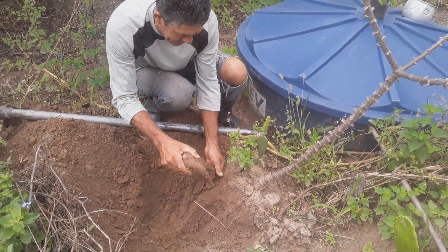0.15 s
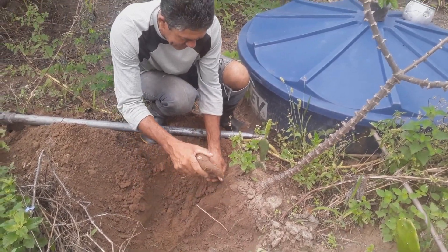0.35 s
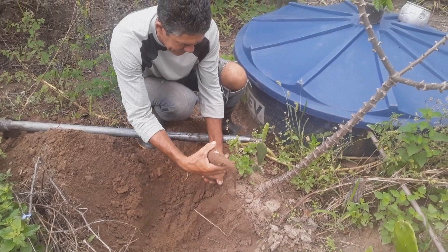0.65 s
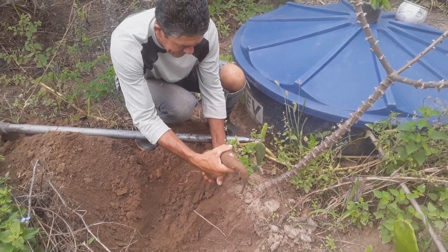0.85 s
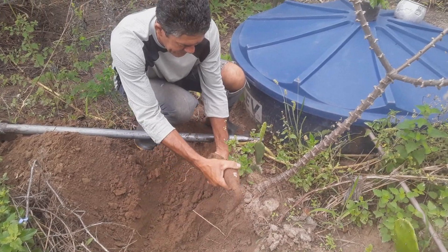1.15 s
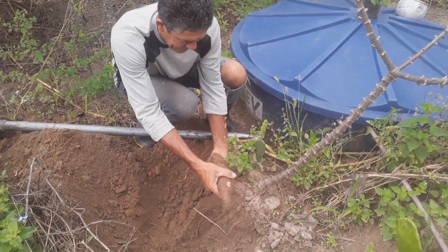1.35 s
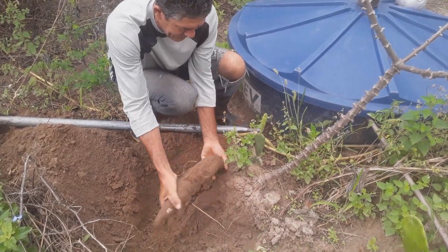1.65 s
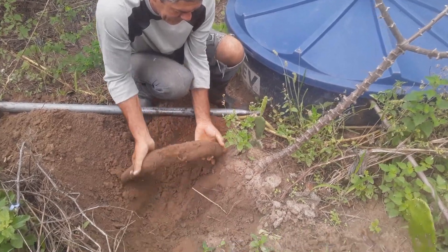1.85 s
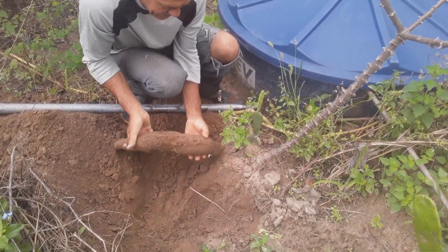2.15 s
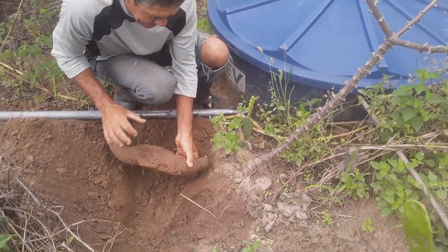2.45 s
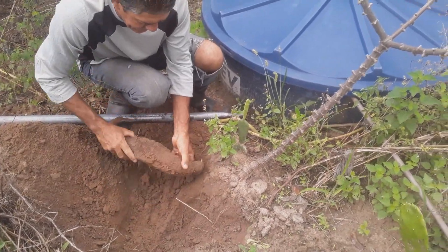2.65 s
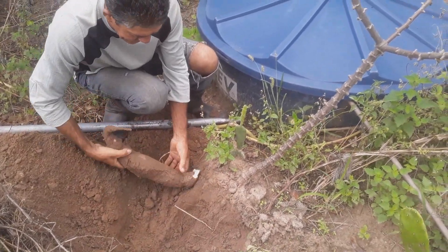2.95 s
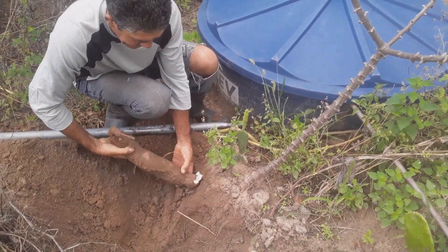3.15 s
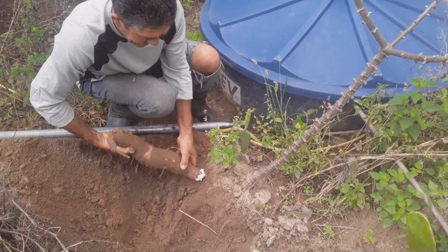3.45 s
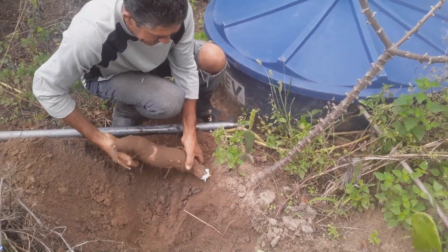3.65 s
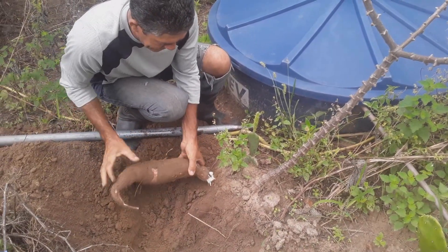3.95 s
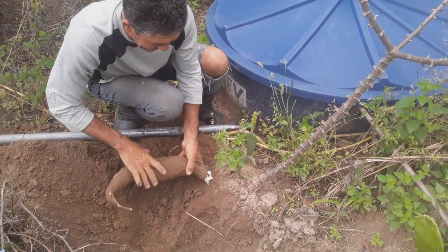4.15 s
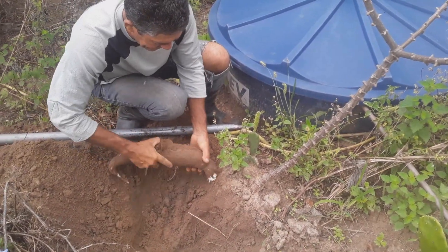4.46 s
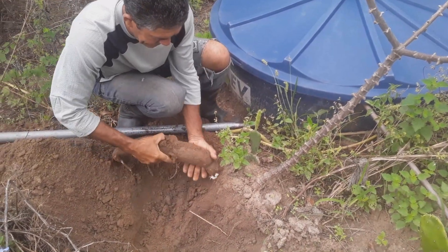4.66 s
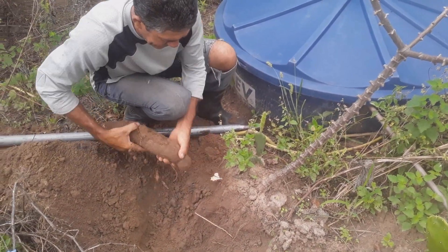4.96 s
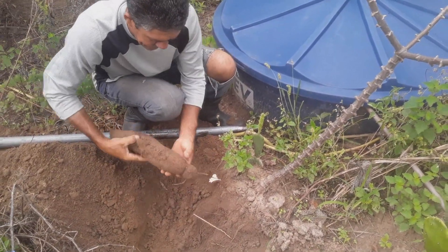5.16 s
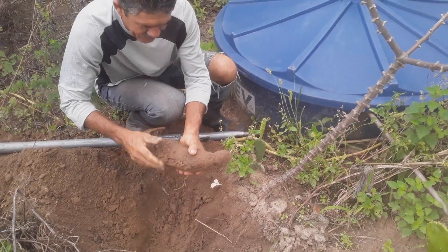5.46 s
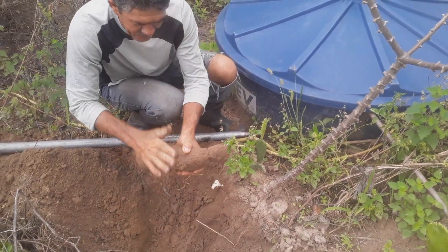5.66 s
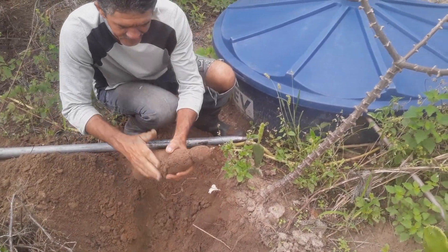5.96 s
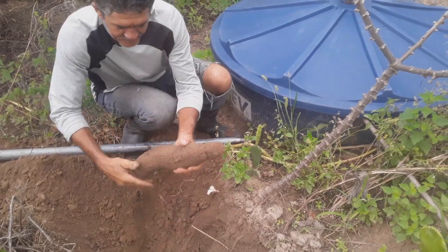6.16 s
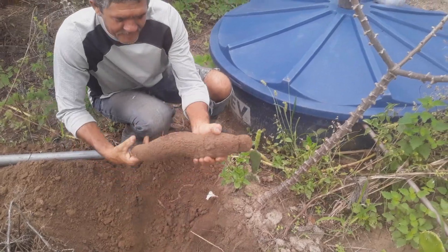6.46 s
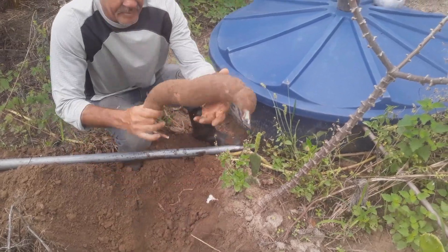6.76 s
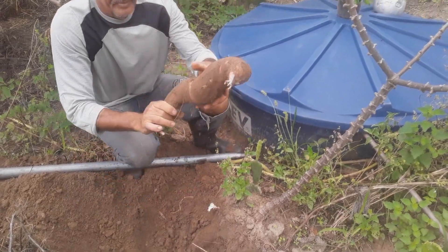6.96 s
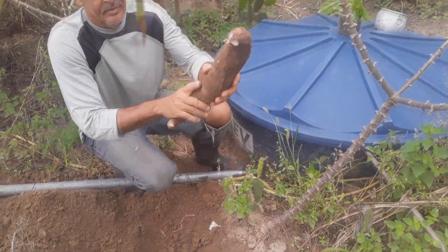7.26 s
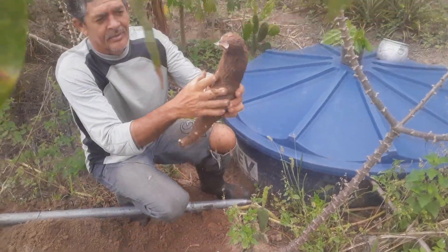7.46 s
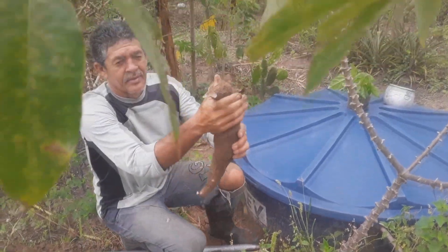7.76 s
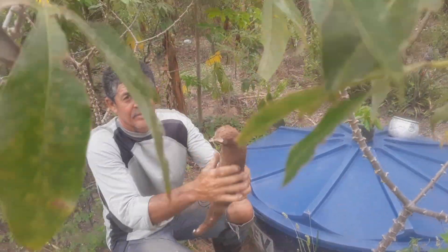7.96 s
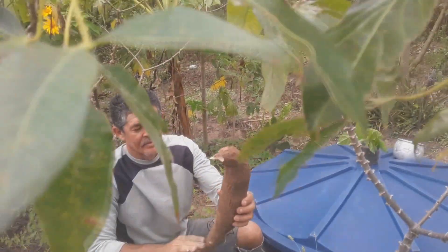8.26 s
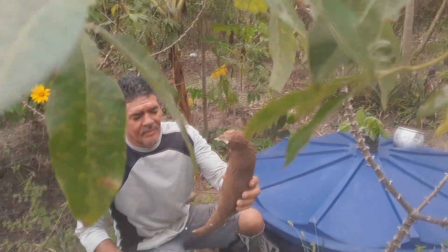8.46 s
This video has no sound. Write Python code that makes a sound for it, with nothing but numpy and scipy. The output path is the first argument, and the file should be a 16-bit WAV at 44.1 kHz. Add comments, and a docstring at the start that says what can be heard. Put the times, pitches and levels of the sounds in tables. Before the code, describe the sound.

Close snaps, crunches and gritty rubbing as a big root is pulled from dry garden earth, over a steady high buzz of cicadas.

```python
"""Cicadas sing and light wind puffs on the microphone while hands rub dry soil off a large root in a garden.
The cicadas' many clicks blur into a high buzz, and skin sliding on grit hisses and rasps. As the root is
worked loose, rootlets and clods snap, and earth crunches and thuds close by. Later a faint far tone comes
three times, something small clinks on metal and a bird chirps once, all over a soft, distant hush."""
import sys
import numpy as np
from scipy import signal
from scipy.fft import rfft, irfft
from scipy.io import wavfile
from scipy.ndimage import uniform_filter1d

SR = 44100
rng = np.random.default_rng(int(sys.argv[2]) if len(sys.argv) > 2 else 0)


def persist_wave(psi):
    """Save psi, clipped to +-1, as 16-bit WAV."""
    counts = np.round(np.clip(psi, -1, 1) * 32767).astype(np.int16)
    wavfile.write(sys.argv[1], SR, np.atleast_2d(counts).T)


N = 379066

# Levels are relative: the functions add their own gains. A spectrum says how strong each frequency is.
# how loud the cicadas are over time: t/s, level/dB
CICADA_LEVELS = [(0.0, -56.5), (1.17, -57.5), (1.6, -60.5), (2.18, -57.5), (3.47, -56), (5.29, -54.5),
                 (7.16, -60), (8.14, -56.5), (8.6, -58.5)]
# the cicadas' high buzz: f/Hz, level/dB
CICADA_SPECTRUM = [(3060, -27.5), (5200, -33), (5920, -15), (6040, 1.5), (6700, 9), (7000, 7.5),
                   (7360, -15), (8000, -16), (10400, -42.5), (17600, -120)]
# how loud the low rumble is over time (wind, and crumbling earth at about 2-3 s): t/s, level/dB
RUMBLE_LEVELS = [(0.0, -72), (0.26, -66.5), (0.81, -91.5), (1.05, -69.5), (2.0, -71), (2.32, -52),
                 (2.56, -57), (2.9, -61.5), (3.18, -68.5), (3.85, -72.5), (5.1, -72.5), (5.5, -78.5),
                 (6.25, -69.5), (6.61, -71.5), (7.04, -67.5), (7.4, -78.5), (7.9, -69), (8.23, -50),
                 (8.6, -75.5)]
# the low rumble: f/Hz, level/dB
RUMBLE_SPECTRUM = [(15, -69.5), (25, -32.5), (79, 4), (145, -3), (216, -7.5), (285, -19), (348, -20.5),
                   (600, -56), (780, -85), (1320, -120)]
# single gusts hitting the microphone: t/s, level/dB, f/Hz
WIND_PUFFS = [(0.112, -38, 104), (0.193, -40.5, 119), (0.409, -52.5, 121), (0.678, -45, 81.6),
              (0.845, -46.5, 87), (1.169, -49, 86.5), (1.515, -47.5, 74.5), (1.766, -41.5, 102),
              (4.18, -44, 81.6), (4.294, -39.5, 95.5), (5.118, -50.5, 95.4), (6.42, -49, 89.6),
              (6.55, -44.5, 99), (6.967, -41, 105), (7.023, -31, 128), (7.051, -39.5, 131.6),
              (7.308, -41.5, 107), (7.58, -40, 106), (7.749, -48.5, 115), (7.934, -40, 110),
              (7.964, -44, 103), (8.051, -32.5, 115), (8.12, -46, 109), (8.168, -33.5, 139),
              (8.185, -30, 122), (8.203, -43, 127), (8.263, -35, 110.6), (8.297, -32, 115),
              (8.325, -37.5, 112), (8.37, -42, 111), (8.554, -42.5, 94)]
# the distant garden hush: f/Hz, level/dB
HUSH_SPECTRUM = [(15, -47.5), (25, -12), (102, -1.5), (145, -5.5), (591, -24), (3080, -26), (5140, -19.5),
                 (6560, -1.5), (8360, -20), (9320, -31.5), (12900, -19.5), (16000, -23.5)]
# palms sliding on the root, one row a stroke: t/s, length/s, hiss level/dB, rasp level/dB
HAND_STROKES = [(-0.05, 0.26, -75, -61.5), (0.444, 0.28, -70, -76.5), (0.896, 0.26, -74, -66),
                (1.17, 0.24, -72, -66), (1.49, 0.23, -68, -66), (1.69, .09, -71, -62),
                (1.817, 0.15, -60, -61.5), (2.02, 0.066, -59.5, -48.5), (2.088, 0.019, -45, -65),
                (2.124, 0.21, -57, -65), (2.227, 0.039, -68, -49), (2.317, 0.025, -57.5, -48),
                (2.357, 0.18, -63.5, -72), (2.574, 0.18, -58, -68), (2.71, .043, -82, -67),
                (2.843, 0.29, -60, -66), (3.055, 0.037, -59.5, -44.5), (3.124, 0.44, -68.5, -72.5),
                (3.419, 0.029, -68, -56), (3.449, 0.17, -64, -68), (3.687, 0.24, -60.5, -65.5),
                (3.954, .12, -72.5, -72), (4.221, 0.1, -57.5, -62.5), (4.303, 0.04, -57, -67.5),
                (4.354, .15, -60, -60), (4.544, 0.11, -70, -78), (4.696, 0.12, -66.5, -71),
                (4.918, 0.049, -57, -58.5), (4.973, 0.016, -50, -62), (4.992, 0.18, -69, -70.5),
                (5.221, 0.27, -63.5, -68), (5.696, 0.045, -43, -46), (5.763, 0.27, -64, -65.5),
                (6.003, 0.056, -48, -43.5), (6.116, .06, -60.5, -68.5), (6.203, .16, -66, -70.5),
                (6.553, 0.076, -58.5, -60.5), (6.681, 0.14, -56.5, -63), (6.877, 0.098, -60.5, -67.5),
                (7.024, 0.11, -69, -74), (7.148, 0.11, -61.5, -69.5), (7.227, 0.024, -49, -60.5),
                (7.263, 0.13, -55, -59), (7.418, 0.13, -60, -64.5), (7.545, 0.13, -56, -68),
                (7.67, 0.099, -60.5, -59), (7.8, 0.094, -63, -68), (7.898, 0.15, -56, -56),
                (8.039, 0.1, -58.5, -57), (8.13, 0.077, -52, -53.5), (8.218, 0.13, -58, -63),
                (8.474, .1, -65.5, -72.5)]
# the bright hiss of skin on grit: f/Hz, level/dB
HISS_SPECTRUM = [(3240, -30.5), (5500, -9), (5780, -10.5), (6580, -5), (7320, -6), (8000, -1.5),
                 (9190, -16), (12600, -7), (15200, -6.5), (16000, -11)]
# the duller rasp of skin on grit: f/Hz, level/dB
RASP_SPECTRUM = [(710, -56.5), (1200, -22), (1320, -23), (1680, -20.5), (2060, -8), (2430, -11), (2830, -6),
                 (3060, -6.5), (3330, -1), (4040, 2.5), (5800, -4.5), (7540, -38), (12800, -120)]
# rootlets and clods snapping: t/s, level/dB, extra gain of the woody ring/dB, of the treble/dB
ROOT_SNAPS = [(0.803, -44, -15, -16), (0.888, -28, -34, -20), (0.926, -19, -15.5, -18),
              (0.959, -25.5, -26, -5.5), (0.965, -26.5, -15, -5), (0.9957, -34, -18, -24),
              (1.0185, -35.5, -12, -14), (1.047, -12, -27, -16), (1.0526, -13, -5, -12),
              (1.1023, -16, -8, -16), (1.1775, -34.5, -19, -35), (1.2027, -37, -16, -14),
              (1.271, -17, -9.5, -10.5), (1.3482, -38.5, -16, -6), (1.3973, -28.5, -48, -14),
              (1.524, -38.5, -37, -7.5), (1.5684, -27.5, -22, -7), (1.5758, -21, -28, -14.5),
              (1.6692, -13, -18.5, -14.5), (1.6907, -13, -23, -18), (1.732, -37.5, -9, -3),
              (1.7644, -31, -30, -17), (1.777, -40.5, -16, 3), (1.847, -43, -20.5, 0),
              (1.956, -31, -13, -14), (1.982, -25, -4, -17.5), (2.012, -40, -27.5, -2.5),
              (2.102, -16.5, -14.5, -27.5), (2.1138, -24.5, 0.5, -19), (2.1308, -17, -12, -15),
              (2.4197, -36, -9, -14), (2.4496, -25, -3, -6.5), (2.5659, -36, -15, -2.5),
              (2.7157, -42.5, -28, 13.5), (2.8, -29, -19, 6), (2.916, -37.5, -15, -4.5),
              (2.9553, -23, -20, -14.5), (3.0032, -24.5, -23.5, -32.5), (3.0147, -25.5, -3.5, -12),
              (3.097, -33.5, 6.5, -34), (3.4362, -25.5, -25, -6.5), (3.573, -40, -36, -1),
              (4.3168, -35, -32, -5), (4.3336, -25.5, -38, -14), (4.8099, -18.5, -5.5, -5),
              (4.8278, -26, -5, -1), (4.8373, -16, -17, -11), (4.843, -34, -36, -11.5),
              (4.85, -13, -14, -1.5), (4.8526, -17.5, -5, -9), (4.8573, -41, -27, 14),
              (5.7014, -44, -12.5, -18), (6.2527, -52, -19, 9.5), (7.2844, -45, -18, -12)]
# the main crack of a snap: f/Hz, level/dB
CRACK_SPECTRUM = [(1410, -34.5), (2400, -17), (3430, -3), (4990, -1), (6100, -2), (6800, -0.5),
                  (8090, -2.5), (9500, -19.5), (12400, -52), (20900, -120)]
# the treble (highest part) of a snap: f/Hz, level/dB
TREBLE_SPECTRUM = [(5290, -26), (9000, -7), (9700, -8), (14000, 1.5), (16000, -6)]
# the notes a broken piece rings with: f/Hz, level/dB, t60/s (the time to fade by 60 dB)
WOOD_NOTES = [(1750, 0, .007), (2300, -1, .006), (2900, -2, .006), (3500, 1, .007)]
# loose earth giving way: t/s at full force, hold/s, level/dB, extra gain of the gritty edge/dB
EARTH_CRUSHES = [(1.957, 0.06, -48.5, -5), (2.038, 0.056, -60.5, 15), (2.094, 0.028, -44.5, -7.5),
                 (2.115, 0.026, -29, -15), (2.224, 0.056, -37.5, -13.5), (2.3, .05, -38, -7.5),
                 (2.385, 0.014, -45.5, -16), (2.447, 0.0067, -30, -17), (2.564, 0.0066, -37, -19),
                 (2.621, 0.062, -51.5, -17.5), (2.722, 0.042, -40, -14.5), (2.821, 0.053, -53.5, -18),
                 (2.914, 0.0057, -47, -26), (2.941, 0.032, -40, -17), (3.018, 0.0023, -29.5, -14),
                 (3.067, 0.042, -43, -10), (3.432, 0.014, -45.5, -6), (3.698, .09, -59, -21),
                 (3.89, 0.041, -67, -13), (4.06, 0.033, -73, -10), (4.811, .025, -55.5, -1),
                 (4.847, 0.0067, -47.5, -5), (5.699, 0.029, -57.5, 0.5), (5.849, 0.18, -70.5, -7),
                 (6.013, 0.044, -65, 3.5), (6.555, 0.067, -59, -30), (7.24, 0.066, -68.5, -2)]
# the low body of crumbling earth: f/Hz, level/dB
EARTH_SPECTRUM = [(71, -34.5), (120, -2), (194, -9), (264, -3), (725, -11.5), (788, -13.5), (1100, -17),
                  (1430, -41), (2420, -120)]
# clods landing: t/s, level/dB, f/Hz, t60/s, extra gain of the hard edge/dB
CLOD_LANDINGS = [(2.114, -14, 544, 0.014, -2.5), (2.135, -20.5, 279, 0.043, -10),
                 (2.159, -25.5, 275, 0.07, -22), (2.418, -22.5, 345, 0.025, -10),
                 (2.449, -20.5, 223, 0.056, -9), (2.564, -22, 325, 0.024, -10),
                 (2.724, -30.5, 327, 0.033, -18), (2.754, -32, 210, 0.071, -14),
                 (2.834, -31, 190, 0.0065, -20), (2.937, -29.5, 665, 0.035, -11),
                 (2.955, -25, 185, 0.06, -8), (3.015, -17, 292, 0.037, -0.5), (3.067, -36, 335, 0.057, 1),
                 (3.094, -36.5, 198, 0.072, -16)]
# the three far tones: t/s, length/s, level/dB
FAR_TONES = [(3.137, 0.19, -69.5), (3.484, .11, -60), (3.923, .25, -64.5)]
# the notes the metal rings with: f/Hz, level/dB, t60/s
METAL_NOTES = [(5540, 6.5, 0.087), (10650, 8.5, 0.063), (12900, -7, .06)]
# the path of the bird's chirp: t/s, lower voice f/Hz, upper voice f/Hz, level/dB
CHIRP_PATH = [(5.35, 6450, 7000, -60.5), (5.365, 6040, 7500, -50), (5.38, 6700, 7600, -41.5),
              (5.392, 7120, 8140, -42), (5.402, 7620, 7900, -59.5)]
# the faint hiss that sets left and right apart: f/Hz, level/dB
STEREO_SPECTRUM = [(24, -37), (40, -8.5), (140, -10), (542, -3.5), (1440, -15.5), (3830, -3.5), (7930, -16),
                   (14100, 2), (16000, -4)]


def from_db(db):
    """Turn decibels into a number to multiply by."""
    return 10 ** (np.asarray(db) / 20)


def rms_one(x):
    """Scale a signal so its average strength (rms) is 1."""
    return x / np.sqrt(np.mean(x ** 2) + 1e-20)


def in_time(rows, outside=None):
    """Join a table's points with straight lines: each column after the time gets one value a sample."""
    times, *columns = np.transpose(rows)
    return [np.interp(np.arange(N) / SR, times, column, outside, outside) for column in columns]


def coloured(x, spectrum):
    """Filter a sound to the given spectrum; white noise keeps its strength."""
    hz, level_db = np.transpose(spectrum)
    grid = np.fft.rfftfreq(4096, 1 / SR)
    log_gain = np.log(from_db(np.interp(np.log(grid + 1), np.log(hz), level_db)))
    cepstrum = irfft(log_gain)
    cepstrum[1:2048] *= 2   # minimum phase: the filter rings after a click, never before it
    cepstrum[2049:] = 0
    response = irfft(np.exp(rfft(cepstrum)))
    return signal.fftconvolve(x, response / np.sqrt(np.sum(response ** 2)))[:N]


def drift(rate):
    """A smooth random wobble of size about 1, changing about rate times a second."""
    pole = np.exp(-2 * np.pi * rate / SR)
    wobble = signal.lfilter([1], [1, -2 * pole, pole * pole], rng.standard_normal(N + SR))
    return rms_one(wobble[SR:])


def grit(per_s, spread_db, share):
    """Tiny clicks of uneven size over smooth noise; share is the clicks' part of the power."""
    sizes = from_db(spread_db * np.minimum(rng.exponential(1, N), 4)) * rng.choice([-1, 1], N)
    grains = rms_one(sizes * (rng.random(N) < per_s / SR))
    return np.sqrt(share) * grains + np.sqrt(1 - share) * rng.standard_normal(N)


def ringing(hz, t60, rise_s):
    """A pure note that starts softly and dies away, with a peak of 1."""
    t = np.arange(int(.25 * SR)) / SR
    wave = np.sin(2 * np.pi * hz * t) * from_db(-60 * t / t60) * (1 - np.exp(-t / rise_s))
    return wave / np.abs(wave).max()


def swell_and_fade(start, length):
    """A loudness curve that swells, holds and dies away; longer ones swell and fade more slowly."""
    t = np.arange(N) / SR - start
    rise_s, fade_s = .006 + .15 * length, .02 + .26 * length
    return np.clip(t / rise_s, 0, 1) * from_db(-20 * np.maximum(t - length, 0) / fade_s)


def add(out, start, sound):
    """Mix a sound in at start seconds."""
    at = round(start * SR)
    out[at:at + len(sound)] += sound[:N - at]


def cicadas(throb_hz=67.5, throb_depth=.2):
    """The clicking plates (tymbals) of many cicadas blur into a buzz; the nearest one throbs through."""
    throb = 1 + throb_depth * np.sin(2 * np.pi * np.cumsum(throb_hz + .34 * drift(4.1)) / SR)
    level = from_db(in_time(CICADA_LEVELS)[0] + .42 * drift(27))
    return level * throb * coloured(grit(per_s=3000, spread_db=.77, share=.86), CICADA_SPECTRUM)


def low_rumble():
    """A lumpy rumble: air swirling on the microphone, and crumbling earth at about 2-3 s."""
    lumps = from_db(5 * drift(16))
    level = from_db(in_time(RUMBLE_LEVELS)[0] + 3)
    return level * lumps * coloured(rng.standard_normal(N), RUMBLE_SPECTRUM)


def wind_puffs():
    """Single puffs of air press on the microphone, swelling and fading within two cycles."""
    out, swell = np.zeros((2, N))
    for start, level_db, hz in WIND_PUFFS:
        cycles = np.arange(int(3.6 * SR / hz)) * hz / SR - 1.4
        puff = np.exp(-(cycles / .48) ** 2) * np.sin(2 * np.pi * (cycles + .15))
        add(out, start, from_db(level_db + 3.5) * puff)
        add(swell, start, from_db(level_db - 25.5) * np.exp(-(cycles / 2.8) ** 2))
    swirl_band = signal.butter(4, [170, 400], "band", fs=SR, output="sos")
    swirls = rms_one(signal.sosfilt(swirl_band, rng.standard_normal(N)))
    return out + swell * swirls   # small swirls ride on each puff


def garden_hush(level_db=-62.5):
    """The distant garden is a soft, almost steady noise."""
    return from_db(level_db + .4 * drift(2.9)) * coloured(rng.standard_normal(N), HUSH_SPECTRUM)


def rubbing():
    """Skin slides on grit in slow strokes and quick swipes: a bright hiss and a duller, grainier rasp."""
    hiss_level, rasp_level = sum(swell_and_fade(start, length) * from_db([[hiss_db], [rasp_db]])
                                 for start, length, hiss_db, rasp_db in HAND_STROKES)
    hiss_level *= from_db(3.5 + 3 * drift(14))
    hiss = coloured(grit(per_s=1500, spread_db=3.8, share=.4), HISS_SPECTRUM)
    rasp_level *= from_db(-4 + 1.2 * drift(11))
    rasp = coloured(grit(per_s=900, spread_db=3.2, share=.32), RASP_SPECTRUM)
    flicker = from_db(.97 * drift(39))
    return flicker * (hiss_level * hiss + rasp_level * rasp)


def snaps(burst_t60=.015, crumbs_t60=.13):
    """A rootlet or clod breaks: a click, a fast burst and a weaker shower of crumbs set it ringing."""
    crack, treble, body = np.zeros((3, N))
    t = np.arange(int(.1 * SR)) / SR
    noise = rng.standard_normal((len(ROOT_SNAPS), len(t)))
    splinters = from_db(4 * rng.standard_normal((len(ROOT_SNAPS), len(t) // 30 + 1)) - 2)
    noise *= splinters.repeat(30, axis=1)[:, :len(t)]   # fibres part in little jerks
    noise[:, 0] = 3.5   # the click of the break itself
    pieces = rng.standard_normal((len(ROOT_SNAPS), len(WOOD_NOTES), 2))   # each rings in its own way
    for (start, level_db, body_db, treble_db), grains, piece in zip(ROOT_SNAPS, noise, pieces):
        burst = grains * from_db(level_db - 12 - 60 * t / burst_t60)
        crumbs = grains * from_db(level_db - 26.5 - 60 * t / crumbs_t60)
        ring = sum(from_db(note_db + louder) * ringing(hz * (1 + .089 * higher), t60, rise_s=.0001)
                   for (hz, note_db, t60), (louder, higher) in zip(WOOD_NOTES, piece))
        woody = signal.fftconvolve(burst + from_db(-9.5) * crumbs, ring[:2000])
        add(crack, start, burst + crumbs)
        add(treble, start, from_db(treble_db + 6.5) * (burst + from_db(-1) * crumbs))
        add(body, start, from_db(body_db - 12.5) * woody)
    bass_cut = signal.butter(6, 1400, "high", fs=SR, output="sos")   # small pieces give off no bass
    body = signal.sosfilt(bass_cut, body)
    return coloured(crack, CRACK_SPECTRUM) + coloured(treble, TREBLE_SPECTRUM) + body


def crunch(build_db_per_s=1300, settle_db_per_s=420):
    """Earth gives way in clumps and trickles out: a low body plus a grittier edge."""
    body = coloured(grit(per_s=700, spread_db=3, share=.5), EARTH_SPECTRUM)
    edge_band = signal.butter(2, [800, 2600], "band", fs=SR, output="sos")
    edge = rms_one(signal.sosfilt(edge_band, grit(per_s=500, spread_db=4, share=.85)))
    clumps = from_db(3.5 * drift(50))
    t = np.arange(N) / SR
    body_level, edge_level = np.zeros((2, N))
    for full_at, hold, level_db, edge_db in EARTH_CRUSHES:
        build_db = build_db_per_s * np.maximum(full_at - t, 0)
        settle_db = settle_db_per_s * np.maximum(t - full_at - hold, 0)
        force = from_db(level_db - 4 - build_db - settle_db)
        body_level += force
        edge_level += from_db(edge_db) * force
    return clumps * (body_level * body + edge_level * edge)


def thuds(edge_hz=1230, edge_t60=.014):
    """Each clod lands with a short, dull ring and a harder, stony edge."""
    out = np.zeros(N)
    for start, level_db, hz, t60, edge_db in CLOD_LANDINGS:
        add(out, start, from_db(level_db - 1.5) * ringing(hz, t60, rise_s=.00088))
        add(out, start, from_db(level_db + edge_db - 6) * ringing(edge_hz, edge_t60, rise_s=.00082))
    return out


def far_tone(hz=780, fade_db_per_s=118):
    """A faint tone sounds and fades three times; distance smears its loudness and pitch."""
    blur_db, blur_hz = 5 * drift(30) - 3, 14 * drift(40)
    t = np.arange(N) / SR
    level = np.zeros(N)
    for start, length, level_db in FAR_TONES:
        fade_db = fade_db_per_s * np.maximum(t - start, 0)
        level += swell_and_fade(start, length) * from_db(level_db - fade_db)
    return level * from_db(blur_db) * np.sin(2 * np.pi * np.cumsum(hz + blur_hz) / SR)


def clink(start=4.98, gain_db=-51):
    """A small, hard thing touches metal once, and a few high notes ring."""
    out = np.zeros(N)
    for hz, level_db, t60 in METAL_NOTES:
        add(out, start, from_db(gain_db + level_db) * ringing(hz, t60, rise_s=.00039))
    return out


def bird_chirp():
    """A bird whistles two rising notes at once, the upper one softer."""
    low_hz, high_hz, _ = in_time(CHIRP_PATH)
    level = from_db(in_time(CHIRP_PATH, outside=-150)[2])
    low = np.sin(2 * np.pi * np.cumsum(low_hz) / SR)
    high = np.sin(2 * np.pi * np.cumsum(high_hz) / SR)
    return level * (low + from_db(-9) * high)


def scene(stereo_db=-33.5):
    """Mix all the sounds; left and right differ only by a faint hiss that follows the loudness."""
    mono = cicadas() + low_rumble() + wind_puffs() + garden_hush() + rubbing()
    mono += snaps() + crunch() + thuds() + far_tone() + clink() + bird_chirp()
    loudness = np.sqrt(np.abs(uniform_filter1d(mono ** 2, size=600)))
    side = from_db(stereo_db) * loudness * coloured(rng.standard_normal(N), STEREO_SPECTRUM)
    return np.array([mono + side, mono - side])


def record(dry, bass_hz=58, top_hz=16500):
    """The microphone loses the deep bass, and the very highest sounds are cut off steeply."""
    bass_cut = signal.butter(3, bass_hz, "high", fs=SR, output="sos")
    top_cut = signal.cheby2(14, 70, top_hz, fs=SR, output="sos")
    return signal.sosfilt(top_cut, signal.sosfilt(bass_cut, dry))


dry = scene()
out = record(dry)
persist_wave(out)
```